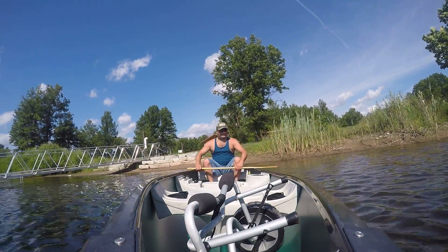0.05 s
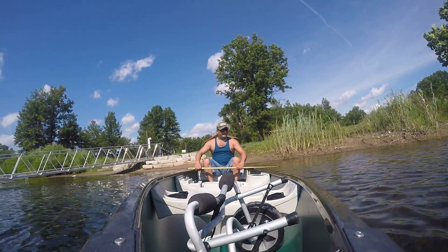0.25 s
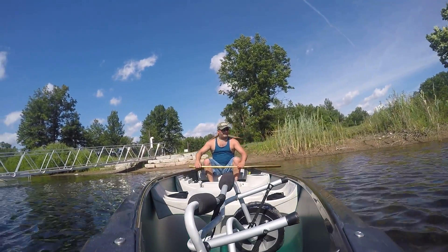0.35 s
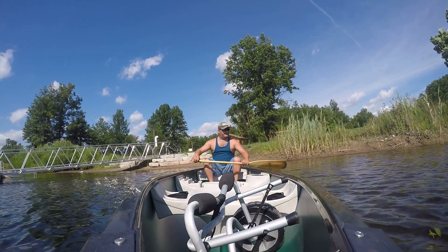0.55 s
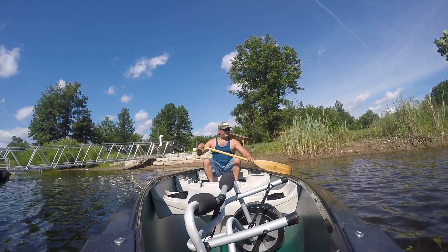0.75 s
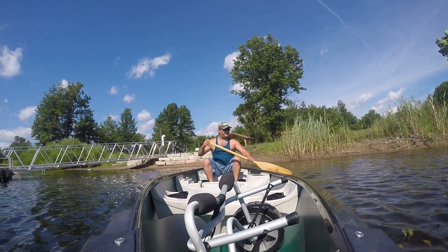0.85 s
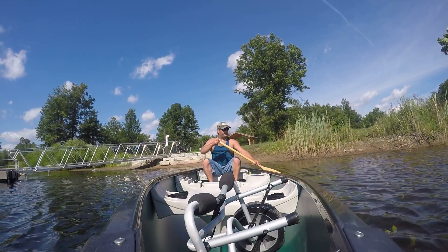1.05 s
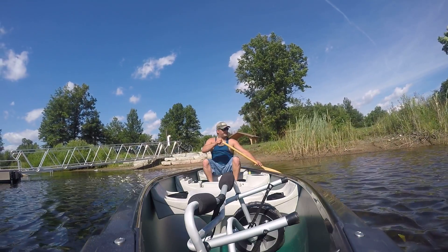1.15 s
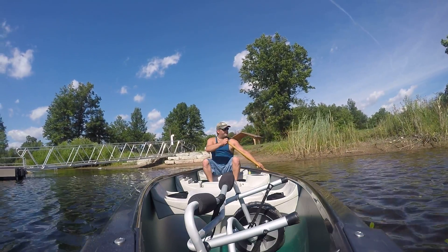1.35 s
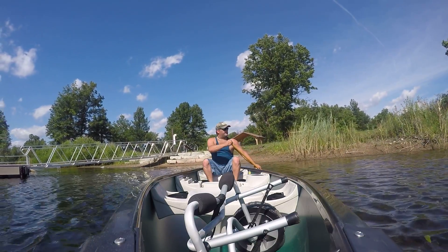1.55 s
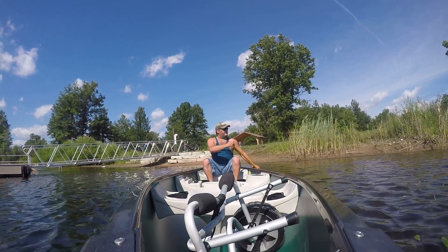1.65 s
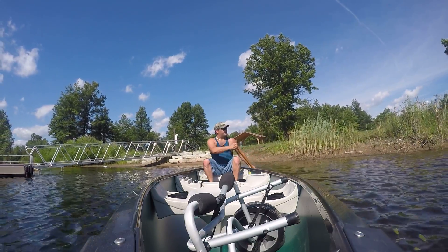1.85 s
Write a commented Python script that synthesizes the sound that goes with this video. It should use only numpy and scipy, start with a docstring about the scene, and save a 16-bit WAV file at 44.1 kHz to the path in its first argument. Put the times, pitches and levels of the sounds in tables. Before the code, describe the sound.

Canoe hull lapped by small waves and drips, opening with deep hollow knocks over low rumble

```python
"""Canoe on a lake

The hull takes a quick run of hollow thumps and shudders, then rumbles on: damped modes, slow swells and noise.
Wavelets slap and gurgle along it as swarms of ringing bubbles and drum on the shell.
Air pockets plink and drops tick as damped sines; a metal part rings faintly after the sharper slaps.
Behind lie a grainy wash of water with stray bubbles, a faint hiss and a thin whine."""
import sys
import numpy as np
from scipy import signal
from scipy.fft import rfft, irfft
from scipy.io import wavfile

SR = 44100
rng = np.random.default_rng(int(sys.argv[2]) if len(sys.argv) > 2 else 0)


def to_wav(sig):
    """Store sig (one row per channel, or 1-D mono) as 16-bit WAV at the path in sys.argv[1].

    Samples outside -1..1 are clipped; the rate is SR.
    """
    pcm = np.clip(np.atleast_2d(sig), -1, 1) * 32767
    pcm = np.round(pcm).astype(np.int16)
    wavfile.write(sys.argv[1], SR, pcm.T)  # frames by channels


N = 83790
T = np.arange(N) / SR

# swell of the wash along the hull, followed by the stray bubbles too: t/s, level/dB
WASH_LEVEL = [(0, -69), (.1, -65.5), (.3, -57), (.48, -66), (.6, -61.5), (.82, -51.5), (.92, -61),
              (1.0, -58), (1.15, -59), (1.36, -55.5), (1.53, -59.5), (1.72, -57.5), (1.9, -64)]


def from_db(db):
    """Amplitude ratio: 20 dB for each factor of ten."""
    return 10 ** (np.asarray(db) / 20)


def rms_one(x):
    """Normalisation of the mean power to one."""
    return x / np.sqrt(np.mean(x ** 2) + 1e-20)


def level(rows):
    """Amplitude envelope: straight lines in dB between (t/s, level/dB) points."""
    return from_db(np.interp(T, *np.transpose(rows)))


def noise(spectrum, source):
    """Spectral shaping: a white source takes the (f/Hz, density/dB) colour, at rms 1."""
    hz, db = np.transpose(spectrum)
    f = np.maximum(np.arange(N // 2 + 1) * SR / N, 1)
    # beyond the outer points it falls by a further 12 dB per octave
    ends = np.minimum(f / hz[0], 1) ** 2 * np.minimum(hz[-1] / f, 1) ** 2
    colour = from_db(np.interp(np.log(f), np.log(hz), db))
    return rms_one(irfft(rfft(source) * ends * colour, N))


def grains(per_s, size_db):
    """Shot noise: clicks of random sign at random moments, with exponentially spread levels."""
    born = rng.random(N) < per_s / SR
    size = from_db(size_db * np.minimum(rng.exponential(1, N), 4))
    return born * size * rng.choice([-1, 1], N)


def resonate(x, hz, t60):
    """Driven resonance: two damped poles, with gain close to 1 at the peak."""
    r = np.exp(-np.log(1000) / (t60 * SR))
    zeros = [(1 - r * r) / 2, 0, (r * r - 1) / 2]
    poles = [1, -2 * r * np.cos(2 * np.pi * hz / SR), r * r]
    return signal.lfilter(zeros, poles, x + 1e-18)  # the tiny offset keeps the filter off denormals


def ping(s, hz, t60, rise, glide=0):
    """Free damped oscillation from time s; its pitch glides in octaves per s until t60 has passed."""
    age = np.maximum(T - s, 0)
    pitch = hz * 2 ** (glide * np.minimum(age, t60))
    phase = 2 * np.pi * np.cumsum((age > 0) * pitch) / SR
    onset = 1 - np.exp(-(age / rise) ** 2)
    return np.sin(phase) * onset * np.exp(-np.log(1000) * age / t60)


def hiss():
    """Stationary broadband noise with a fixed spectrum."""
    # colour of the hiss: f/Hz, density/dB
    spectrum = [(2000, -1.5), (4000, 0.5), (5500, -3), (8000, -7.5), (12000, -9), (15000, -9.5)]
    return from_db(-67) * noise(spectrum, rng.standard_normal(N))


def whine():
    """Narrowband noise: a random drive keeps one resonance sounding."""
    whine_hz, t60_s, whine_db = 4750, 0.031, -76
    return from_db(whine_db) * rms_one(resonate(rng.standard_normal(N), whine_hz, t60_s))


def wash():
    """Shot noise of moving water, with the forced drone of the shell that it excites."""
    # colour of the water: f/Hz, density/dB
    water_spectrum = [(200, -7), (400, 1), (780, 10), (1200, -9.5), (2300, -5.5), (3300, -26), (5000, -41)]
    # colour of the shell's dull drone: f/Hz, density/dB
    shell_spectrum = [(110, -8.5), (155, 0), (230, -2), (310, -12), (450, -20)]
    grains_per_s, grain_db = 2500, 2.5
    shell_db = 0.5  # against the water
    water = noise(water_spectrum, grains(grains_per_s, grain_db))
    shell = from_db(shell_db) * noise(shell_spectrum, rng.standard_normal(N))
    return level(WASH_LEVEL) * (water + shell)


def strays(count=16):
    """Bubble resonance: random clicks ring small bubbles, whose level follows the wash."""
    strays_per_s, size_db, ring_cycles = 110, 2.5, 21  # the ring falls by 60 dB in so many cycles
    low_hz, high_hz = 640, 2500
    strays_db = -9  # against the wash level
    rings = 0
    for hz in np.geomspace(low_hz, high_hz, count):
        clicks = grains(strays_per_s / count, size_db)
        rings = rings + resonate(clicks, hz, ring_cycles / hz) / hz
    return from_db(strays_db) * level(WASH_LEVEL) * rms_one(rings)


def metal():
    """Modal ringing: each jolt from a sharper slap sets off the modes of a metal part."""
    # jolts: t/s, level/dB
    jolts = [(0.169, -36), (0.42, -41.5), (0.521, -48.5), (1.289, -46.5), (1.355, -49), (1.816, -47.5)]
    # modes of the part: f/Hz, level/dB added to the jolt, t60/s
    modes = [(1795, 0, 0.18), (2030, -24, 0.13), (2527, -26.5, .15)]
    rise_s = 0.0014
    return sum(from_db(db + mode_db) * ping(s, hz, t60, rise_s)
               for s, db in jolts for hz, mode_db, t60 in modes)


def drops():
    """Transient resonance: each drop ticks on the water as a short damped sine."""
    # ticks: t/s, level/dB, f/Hz, t60/s
    ticks = [(0.1637, -42.5, 5140, .007), (0.1657, -21.5, 2920, 0.0096), (0.1684, -34.5, 3970, 0.011),
             (0.2352, -36, 2270, 0.017), (0.2354, -45, 6200, 0.0067), (0.2450, -26.5, 2310, 0.0098),
             (0.2454, -30, 3140, 0.015), (0.463, -36, 2290, 0.009), (0.547, -39, 3020, 0.0061),
             (0.58, -37, 2130, .008), (0.654, -25.5, 2160, 0.011), (0.7105, -40.5, 3070, 0.011),
             (0.744, -41, 1530, 0.009), (0.764, -33.5, 2130, 0.0099), (1.068, -51.5, 2360, 0.038),
             (1.2895, -35, 2190, 0.012), (1.2915, -29.5, 1750, 0.011), (1.335, -43, 3580, 0.011),
             (1.336, -34, 1170, 0.008), (1.4515, -38, 780, 0.016), (1.657, -29.5, 2360, 0.0068),
             (1.658, -37.5, 2980, 0.007), (1.7251, -36, 2280, 0.0094)]
    rise_s = 0.00034
    return sum(from_db(db) * ping(s, hz, t60, rise_s) for s, db, hz, t60 in ticks)


def plinks():
    """Bubble resonance: trapped air pockets ring as damped sines with gliding pitch."""
    # air pockets: t/s, level/dB, f/Hz, rise/s, t60/s, glide/(octaves per s)
    pockets = [(0.1680, -13.5, 1680, 0.00034, 0.0046, -8), (0.4173, -19.5, 1337, 0.0019, 0.026, 4),
               (0.4194, -20, 1101, 0.0013, 0.024, -83), (0.438, -44, 1940, .003, 0.033, 39),
               (0.5172, -37, 1726, 0.00092, 0.043, -5), (0.6539, -15.5, 1390, 0.00063, 0.01, 6),
               (0.6552, -19, 1335, 0.00055, 0.039, 0.5), (0.823, -39.5, 1378, 0.0055, 0.12, -36.5),
               (0.994, -46.5, 1274, 0.0099, .06, -46), (0.862, -35.5, 1143, .004, 0.052, -10.5),
               (1.218, -32, 823, 0.0039, 0.033, -3.5), (1.436, -37.5, 2130, .003, 0.039, 1.5),
               (1.450, -43.5, 2480, 0.0024, 0.028, 13), (1.690, -39.5, 1212, 0.0021, 0.081, -8.5),
               (1.815, -28.5, 1645, 0.00061, 0.028, 5), (1.818, -33, 1280, 0.00067, 0.023, -66)]
    return sum(from_db(db) * ping(s, hz, t60, rise, glide)
               for s, db, hz, rise, t60, glide in pockets)


def lap_power(pitches):
    """Energy sharing: each slap spreads its power over pitch bands around a moving centre."""
    # wavelets on the hull: t/s, rise/s, fall/s, level/dB, first f/Hz, last f/Hz
    wavelets = [(0.147, .004, 0.005, -41.5, 1000, 590), (0.1625, 0.0043, 0.0073, -28.5, 2440, 1330),
                (0.171, .003, 0.017, -42, 750, 600), (0.224, 0.015, 0.13, -54, 1300, 880),
                (0.372, 0.0057, 0.0065, -55, 1610, 1300), (0.415, 0.0028, .010, -35, 1300, 1010),
                (0.513, 0.007, 0.0064, -44.5, 1900, 1060), (0.576, 0.0018, 0.012, -42.5, 2260, 720),
                (0.593, 0.0039, 0.0088, -50, 2500, 1310), (0.628, 0.0023, 0.017, -52, 1700, 1430),
                (0.667, 0.0032, 0.017, -44, 1900, 1270), (0.707, 0.0045, 0.01, -39.5, 2770, 1190),
                (0.739, 0.0038, 0.009, -43, 2380, 1450), (0.758, 0.003, 0.023, -46.5, 2170, 1060),
                (0.781, 0.0055, 0.0062, -56.5, 2000, 1190), (0.803, .017, 0.01, -43.5, 2400, 835),
                (0.836, 0.033, 0.011, -46.5, 990, 790), (0.942, 0.015, 0.019, -46.5, 2380, 1740),
                (0.966, 0.033, 0.013, -47, 1390, 740), (1.100, 0.018, 0.0045, -50.5, 2140, 880),
                (1.141, 0.0042, 0.0084, -52.5, 1910, 800), (1.194, 0.0055, 0.021, -54, 2050, 710),
                (1.261, 0.0097, 0.024, -42, 2110, 760), (1.283, 0.0038, 0.015, -48, 2220, 1130),
                (1.333, 0.028, 0.017, -44.5, 1730, 845), (1.399, 0.0037, 0.026, -56, 2360, 890),
                (1.438, 0.011, 0.015, -47, 2060, 1070), (1.569, 0.0095, 0.02, -59, 900, 1500),
                (1.638, 0.0037, 0.021, -46, 1640, 1000), (1.688, 0.0087, 0.028, -44, 1240, 655),
                (1.747, 0.0024, 0.0091, -53, 890, 760), (1.807, 0.016, 0.0047, -38, 1850, 1140),
                (1.876, 0.01, 0.0075, -42, 1900, 830)]
    width_oct, skirt_oct, skirt_db = 0.29, 0.53, 0.5
    power = np.zeros((len(pitches), N))
    for s, rise, fall, db, first_hz, last_hz in wavelets:
        on = (T > s) & (T < s + rise + 3 * fall)
        age = T[on] - s
        envelope = np.minimum(age / rise, 1) * np.exp(-np.maximum(age - rise, 0) / fall)
        centre = first_hz * (last_hz / first_hz) ** np.minimum(age / (rise + fall), 1)
        away = np.log2(pitches[:, None] / centre)  # octaves
        core = np.exp(-(away / width_oct) ** 2)
        skirt = from_db(skirt_db) ** 2 * np.exp(-(away / skirt_oct) ** 2 / 2)
        share = core + skirt
        power[:, on] += (from_db(db) * envelope) ** 2 * share / share.sum(0)
    return power


def bubble_swarms(pitches, power):
    """Bubble resonance: small bubbles mostly ring first, larger ones after, so the pitch falls."""
    bubbles_per_s, size_db, ring_cycles = 6000, 2, 37  # the ring falls by 60 dB in so many cycles
    water_top_hz = 2597
    swarm = 0
    for hz, band in zip(pitches, power):
        bubbles = grains(bubbles_per_s / len(pitches), size_db)
        swarm = swarm + np.sqrt(band) * rms_one(resonate(bubbles, hz, ring_cycles / hz))
    return signal.sosfilt(signal.butter(8, water_top_hz, fs=SR, output="sos"), swarm)


def drumming(power):
    """Forced vibration: each wavelet's power drives the shell, which answers a little later."""
    # colour of the shell under the wavelets: f/Hz, density/dB
    spectrum = [(110, -7.5), (165, 0.5), (230, -4.5), (330, -9), (480, -9.5), (700, -8)]
    drumming_db, lag_s = -7.5, 0.0097  # level against the slap, before the water's low-pass
    push = np.sqrt(np.interp(T - lag_s, T, power.sum(0)))
    return from_db(drumming_db) * push * noise(spectrum, rng.standard_normal(N))


def laps():
    """Superposition: the same slap power feeds the bubbles and the drumming shell."""
    pitches = np.geomspace(350, 5000, 24)  # Hz
    power = lap_power(pitches)
    return bubble_swarms(pitches, power) + drumming(power)


def rumble():
    """Band-wise modulated noise: a low sway and the boom above it swell separately."""
    # swells: t/s, sway level/dB, boom level/dB
    swells = [(0, -40, -43), (0.081, -49, -47), (.13, -46, -39), (.3, -30.5, -34), (.56, -50.5, -43),
              (.68, -38.5, -52), (.8, -38, -49.5), (.9, -42, -41.5), (.99, -33.5, -41.5),
              (1.06, -42, -48.5), (1.13, -46.5, -36), (1.22, -39, -44), (1.32, -45.5, -39.5),
              (1.45, -38.5, -40.5), (1.54, -50, -45), (1.6, -40.5, -44.5), (1.75, -45, -46),
              (1.9, -44, -45)]
    # colour of the sway: f/Hz, density/dB
    sway_spectrum = [(22, -14), (36, 6.5), (48, -18), (60, -22)]
    # colour of the boom: f/Hz, density/dB
    boom_spectrum = [(48, -16.5), (60, -1), (71, 3), (84, -7.5), (105, -21), (150, -23), (230, -30.5),
                     (400, -47.5)]
    sway = level([(s, db) for s, db, _ in swells]) * noise(sway_spectrum, rng.standard_normal(N))
    boom = level([(s, db) for s, _, db in swells]) * noise(boom_spectrum, rng.standard_normal(N))
    return sway + boom


def shudder():
    """Amplitude modulation: the whole boat shakes at one low frequency under Gaussian swells."""
    # shudders: t/s at the peak, half length/s down to 1/e, level/dB
    shudders = [(0.248, 0.031, -15), (0.497, 0.048, -26)]
    shudder_hz = 38.5
    swell = sum(from_db(db) * np.exp(-((T - s) / half) ** 2) for s, half, db in shudders)
    return swell * np.sin(2 * np.pi * shudder_hz * T)


def thumps():
    """Modal synthesis: every thump rings all modes of the shell, weighted by its spectral tilt."""
    # thumps: t/s, level/dB, tilt/(dB per octave above the lowest mode)
    blows = [(0.1513, -13, -0.5), (0.1955, -7.5, -15.5), (0.2928, -12.5, -17), (0.419, -40.5, 2.5),
             (1.277, -47, 6.5), (1.826, -51, 3.5)]
    # modes of the hull: f/Hz, level/dB added to the thump, t60/s
    modes = [(67.38, -13, 0.84), (75.05, -2, 0.48), (153.1, -7.5, 0.32), (188.1, -15, 0.59),
             (237.3, -6, 0.29), (287, -9, .12), (502.5, -17.5, 0.11)]
    rise_s = 0.0054
    lowest_hz = modes[0][0]
    out = 0
    for s, db, tilt in blows:
        for hz, mode_db, t60 in modes:
            mode_level = db + mode_db + tilt * np.log2(hz / lowest_hz)
            out = out + from_db(mode_level) * ping(s, hz, t60, rise_s)
    return out


def scene():
    """Linear superposition of background, water and boat in one channel."""
    background = hiss() + whine() + wash() + strays()
    water = drops() + plinks() + laps()
    boat = metal() + rumble() + shudder() + thumps()
    return (background + water + boat)[None]


def record(dry):
    """Band limiting: a steep elliptic low-pass cuts the top."""
    cutoff_hz = 15200
    return signal.sosfilt(signal.ellip(10, .1, 80, cutoff_hz, fs=SR, output="sos"), dry)


dry = scene()
out = record(dry)
to_wav(out)
```